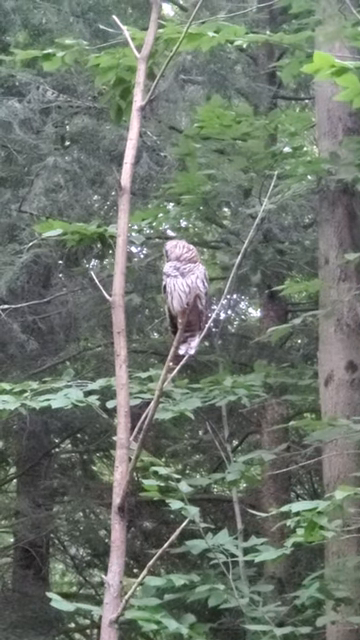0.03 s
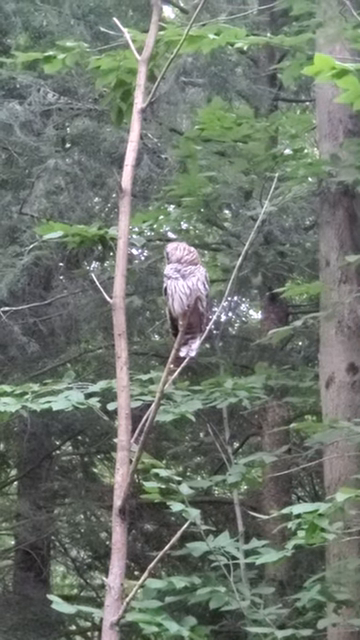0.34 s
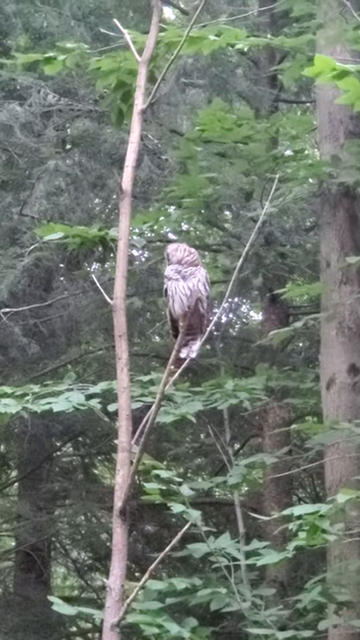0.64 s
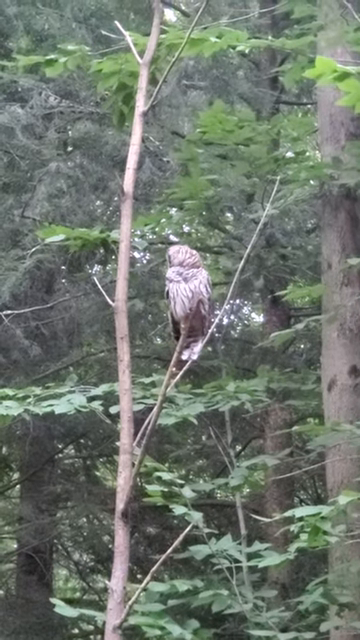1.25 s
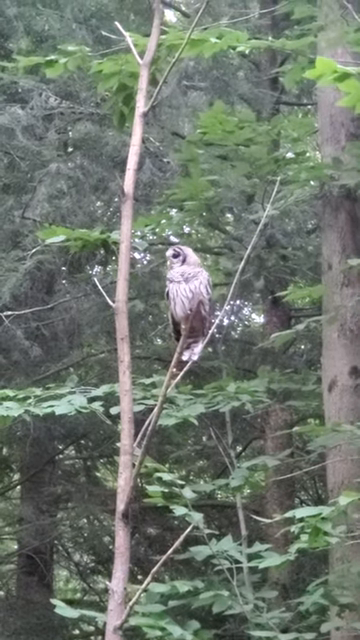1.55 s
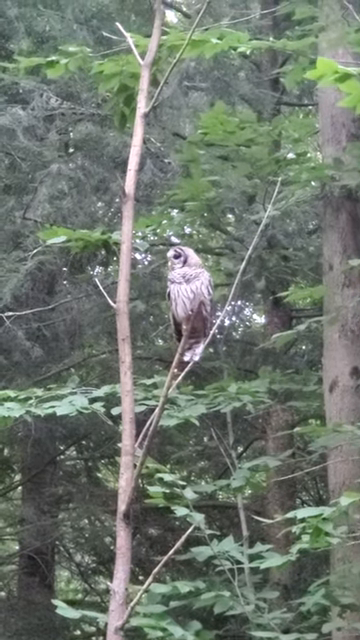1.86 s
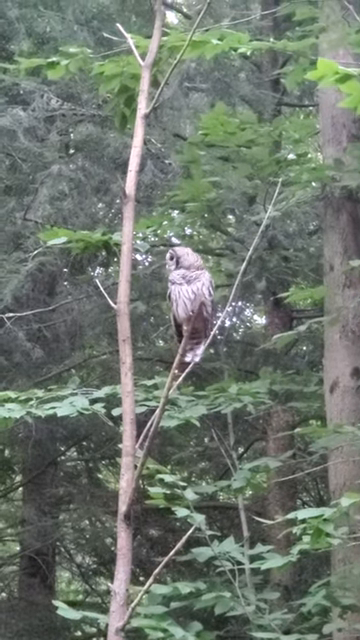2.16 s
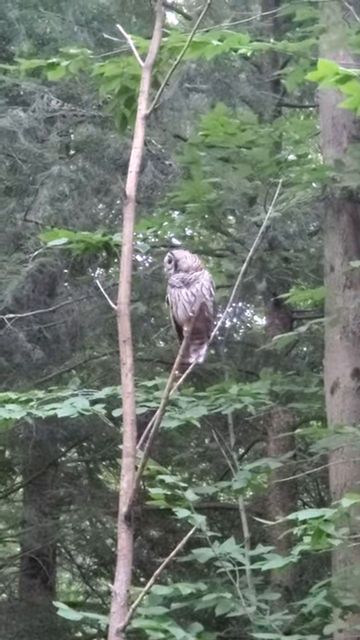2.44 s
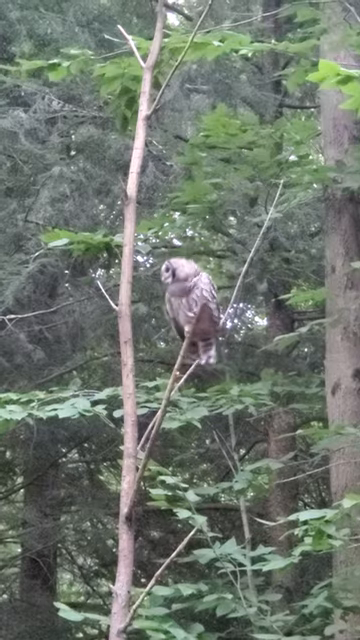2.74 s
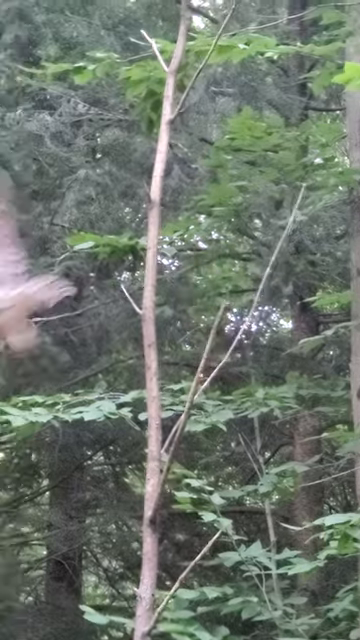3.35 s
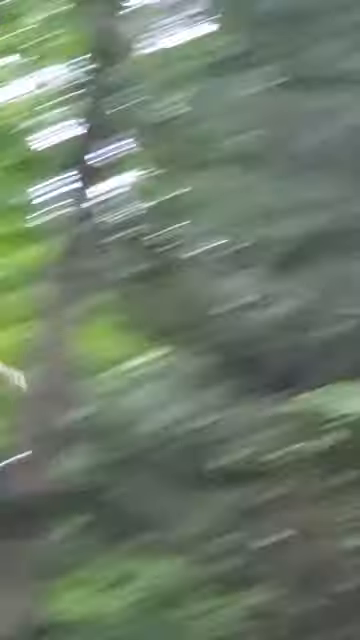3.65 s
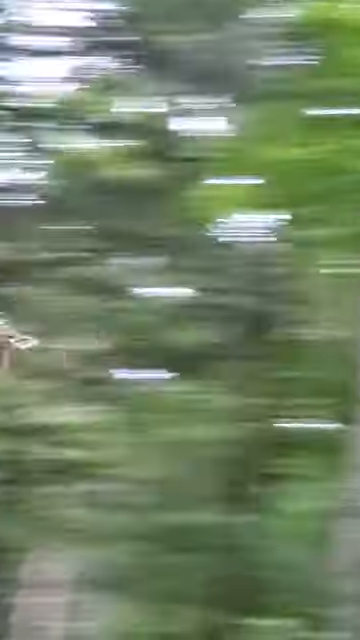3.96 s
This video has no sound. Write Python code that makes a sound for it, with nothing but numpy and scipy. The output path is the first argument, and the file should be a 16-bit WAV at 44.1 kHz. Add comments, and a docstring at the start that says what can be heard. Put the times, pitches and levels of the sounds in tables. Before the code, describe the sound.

An owl screeches once in a forest, over a steady low rumble, faint hiss and a throb like a distant idling engine. The harsh, raspy call starts at about 2.4 seconds with a wavering high whistle on top. It thins to a squeak near 3.2, swells twice more and ends in a yelp at 3.7, echoing briefly. A soft rustle rises from 3.4 seconds to the end.

```python
"""One long, harsh owl screech cuts through a forest: a rough voice near 1.1 kHz, a wavering whistle above it
and a rasp of turbulent breath, both pulsed by the voice. It thins to a squeak midway, swells twice more
and ends in a yelp that the trees scatter. Underneath sit a low throb like a distant idling engine,
a rumble and a faint hiss. A brief high sizzle in the trees comes before the call,
and a soft broadband rustle swells at the end."""
import sys
import numpy as np
from scipy import signal
from scipy.fft import rfft, irfft
from scipy.io import wavfile

SR = 44100
rng = np.random.default_rng(int(sys.argv[2]) if len(sys.argv) > 2 else 0)


def put_to_file(sound):
    """Save the sound as 16-bit audio at rate SR, in the file named by the first command-line argument."""
    columns = np.atleast_2d(sound).T  # one column per channel
    safe = np.clip(columns, -1, 1)
    whole_steps = np.round(safe * 32767)
    wavfile.write(sys.argv[1], SR, whole_steps.astype(np.int16))


N = 176400
TIME, FREQS = np.arange(N) / SR, np.arange(N // 2 + 1) * SR / N

# The owl's voice. Its layers' levels come before their trims; jitter and shimmer scale with roughness.
# time_s, pitch_hz, level_db, roughness, overtone_boost_db
VOICE_CURVE = [(2.39, 1250, -77, 0.87, 8), (2.414, 1224, -66, 0.93, -4), (2.422, 1115, -54, 0.19, -5),
               (2.5, 1115, -59, 0.42, 1), (2.58, 1115, -58.5, 0.56, -1), (2.615, 1155, -58, 0.38, -3),
               (2.85, 1120, -58.5, 0.35, -6), (3.01, 1095, -60, 0.47, -8), (3.045, 1090, -75, 0.9, 9),
               (3.085, 1100, -56.5, 0.53, -6), (3.12, 1105, -60.5, 0.45, 0.5), (3.17, 1090, -80, 0.71, 10),
               (3.3, 1080, -90, 0.55, 5), (3.326, 1095, -51, 0, -5), (3.36, 1117, -52, 0.22, -6),
               (3.41, 1100, -54, 0.1, -15), (3.455, 1070, -70.5, 0.53, 12), (3.53, 1100, -94, 0.96, 0),
               (3.595, 1190, -62.5, 0.37, -1), (3.635, 1220, -66, 0.5, 7), (3.646, 1177, -50, .3, -4.5),
               (3.662, 1060, -55.5, 0.28, 10.5), (3.675, 1050, -80, 0.3, 4)]
# The voice's timbre: harmonic_number, level_db
VOICE_HARMONICS = [(1, 0), (2, -3.5), (3, -23.5), (4, -14.5), (5, -3.5), (6, -16), (7, -17.5), (8, -18.5)]
VOICE_JITTER, VOICE_SHIMMER, JITTER_HZ = .055, .8, 250
# The high whistle: time_s, pitch_hz, level_db, roughness
WHISTLE_CURVE = [(2.381, 6710, -71, 0.2), (2.388, 6830, -62, 0.3), (2.416, 6340, -55.5, 0.23),
                 (2.426, 6700, -64, 0.65), (2.44, 6596, -57, 0.34), (2.475, 6710, -55.5, 0.66),
                 (2.505, 6244, -62, 1.1), (2.55, 6450, -55, 1.02), (2.595, 6595, -64, 0.77),
                 (2.635, 6640, -54.5, 0.26), (2.68, 6730, -60, 0.22), (2.8, 6720, -61, 0.3),
                 (2.96, 6650, -76, 0.7), (3.02, 7190, -72, 0.1), (3.08, 7030, -66, 0.25),
                 (3.122, 6950, -65, 0.21), (3.148, 6430, -59, 0.2), (3.168, 6320, -60, 0.06),
                 (3.188, 5766, -57, 0.24), (3.21, 5740, -71, 0.16), (3.228, 5800, -53.5, 0.2),
                 (3.245, 5540, -66, 0.34), (3.295, 5640, -97, 0.33), (3.303, 6450, -59, .2),
                 (3.318, 7100, -82, 0.7), (3.39, 7050, -72, 0.88), (3.44, 6870, -55, 0.24),
                 (3.478, 6680, -56, .35), (3.487, 7440, -65, 0.27), (3.502, 6660, -58, 0.2),
                 (3.517, 6090, -58, 0.23), (3.538, 6400, -96, 0.04), (3.546, 6770, -57, 0),
                 (3.563, 6900, -58, .1), (3.578, 6470, -64, 0.3), (3.596, 6960, -50, 0.28),
                 (3.62, 7180, -51, 0.2), (3.636, 7070, -48.5, 0.18), (3.648, 6404, -53, 0.9),
                 (3.66, 6600, -46, 0.6), (3.666, 6140, -90, .9)]
WHISTLE_JITTER, WHISTLE_SHIMMER, WHISTLE_FLUTTER_HZ = .034, .77, 384
WHISTLE_BEAT, WHISTLE_FRINGE, FRINGE_WIDTH_HZ = .18, .5, 610
# The squeak where the voice gives way: time_s, pitch_hz, level_db
SQUEAK_CURVE = [(3.18, 4295, -77), (3.195, 4293, -60.5), (3.255, 4320, -58), (3.276, 3970, -77),
                (3.293, 4250, -60), (3.32, 4310, -87), (3.5, 3960, -90), (3.518, 3952, -61),
                (3.54, 4240, -66), (3.56, 3980, -75)]
SQUEAK_JITTER, SQUEAK_OCTAVE_DB = .004, -20
# Faders for the rasp's three bands: time_s, low_db, middle_db, treble_db
RASP_FADERS = [(2.385, -88, -88, -73), (2.41, -82, -75, -64), (2.43, -74, -63, -63),
               (2.47, -73, -57.5, -70), (2.7, -67, -56, -68.5), (2.97, -64.5, -57.5, -70),
               (3.051, -63, -58, -80), (3.09, -64, -58, -68), (3.16, -61.5, -60, -89),
               (3.21, -74, -72, -88), (3.28, -80, -93, -93), (3.305, -75, -52.5, -85),
               (3.33, -61.5, -60, -64), (3.4, -60.5, -55, -62), (3.46, -62.5, -60, -68),
               (3.52, -67, -69, -93), (3.57, -62, -60, -79), (3.61, -59.5, -61, -62),
               (3.64, -56.5, -61, -68), (3.658, -52, -60, -62), (3.677, -77, -56, -66)]
# Throat and beak resonances in each band: frequency_hz, density_db
RASP_LOW_COLOUR = [(1000, -5), (1800, -29), (2050, -2), (2330, 3), (2850, -2), (3350, -0.5), (3900, -10.5),
                   (4500, -15), (6000, -34)]
RASP_MIDDLE_COLOUR = [(3000, -30), (3950, -12), (4300, 1), (4600, 4), (5000, -5), (5550, -1), (6100, -1),
                      (6700, 3), (7300, -5), (8000, -20), (12000, -45)]
RASP_TREBLE_COLOUR = [(6000, -52), (7000, -24), (7700, 10.5), (8300, 5), (8950, 5), (9500, -4), (10300, -9),
                      (13000, -20), (16000, -44)]
RASP_PULSING, RASP_FLUTTER_DB, RASP_FLUTTER_HZ = .5, 1, 70
VOICE_TRIM_DB, SQUEAK_TRIM_DB, RASP_TRIM_DB = -1.2, -1, -2
NEAR_TONE_SEND_DB, NEAR_RASP_SEND_DB, FOREST_SEND_DB = -12, -2, -6.5

# The engine's idle: time_s, speed_hz
ENGINE_IDLE = [(0, 17.54), (.9, 17.53), (1.35, 17.6), (2.1, 17.65), (2.6, 17.62), (4, 17.61)]
# The throb's timbre: harmonic_number, level_db
ENGINE_HARMONICS = [(1, -9), (2, 1.5), (3, -8.5), (4, 3), (5, -5.5), (6, 0.5), (7, -27), (8, -4), (9, -17),
                    (10, -15), (11, -44.5), (12, -13), (13, -11), (14, -34), (15, -9), (16, -16.5),
                    (17, -10.5), (18, -31), (19, -23)]
ENGINE_TRIM_DB, ENGINE_SHIMMER, ENGINE_SMEAR_HZ, FIRST_FIRING_S = -51, .15, 185, .0305
# Faders for the soft rustle that swells at the end and the sizzle in the trees: time_s, level_db
RUSTLE_FADER = [(3.0, -100), (3.4, -68.5), (3.85, -67.5), (3.95, -67), (4.0, -61)]
SIZZLE_FADER = [(.7, -100), (1.15, -87), (1.7, -89), (2.0, -100)]
# Colours of the background noises: frequency_hz, density_db
RUSTLE_SPECTRUM = [(500, -4), (1300, 4), (2000, -3), (3500, 0), (4700, -7), (5800, -2), (8000, -14),
                   (12500, -10), (15000, -21)]
SIZZLE_SPECTRUM = [(4800, -52), (5450, 3), (5750, -4), (6000, 6), (6600, -60)]
RUMBLE_SPECTRUM = [(20, -35), (35, -14.5), (60, 0), (90, 3.5), (130, -5), (190, -11.5), (270, -5.5),
                   (380, -16), (520, -19), (660, -16), (850, -25.5), (1200, -30.5), (1600, -41),
                   (3000, -69.5)]
HISS_SPECTRUM = [(1000, 1), (2000, 5), (3200, 3.5), (3950, 3.5), (4400, -4.5), (5200, -4), (5700, -0.5),
                 (6300, -7), (8000, -6), (11200, -7.5), (11900, 1.5), (12950, 1.5), (13250, -13.5),
                 (16000, -6.5)]
# How alike the two sides of those noises are: frequency_hz, correlation (clipped to 0-0.995 in use)
STEREO_LIKENESS = [(60, 0.81), (130, 0.95), (290, 0.86), (640, 0.42), (1410, -0.78), (3100, -3.5),
                   (6820, 0.01), (15000, 0.11)]
# Stereo placement of the owl and the background: frequency_hz, left_minus_right_db
OWL_BALANCE = [(950, 1), (1250, 16.5), (1500, 7), (2250, -11), (3200, 0.5), (4400, 8), (5600, -4),
               (6600, 14.5), (7300, -12), (8050, 39), (8700, 0), (11000, 20)]
BACKGROUND_BALANCE = [(60, 1.6), (300, 0.7), (700, 1.5), (1300, -4.5), (2000, -3), (3800, 4.5),
                      (5700, -1.5), (7500, 10.5), (10000, 3.5), (12400, 11.5), (15000, -4)]


def owl_voice():
    """A harmonic tone roughened by jitter and shimmer; gives the sound and its running phase."""
    hz, db, rough, boost_db = in_time(VOICE_CURVE)
    cycle = phase_of(hz * (1 + VOICE_JITTER * rough * drift(JITTER_HZ)))
    voice = 0
    for k, harmonic_db in VOICE_HARMONICS:
        gain = from_db(harmonic_db + boost_db * (k > 1))
        partial = np.sin(k * cycle + rng.uniform(0, 2 * np.pi))
        voice += gain * partial * shimmer(VOICE_SHIMMER * rough, JITTER_HZ)
    return np.sqrt(2) * from_db(db + VOICE_TRIM_DB) * gate(VOICE_CURVE) * voice, cycle


def owl_whistle(voice_cycle):
    """A second, high oscillator, by turns pure and ragged, beating with the voice inside a noisy fringe."""
    hz, db, rough = in_time(WHISTLE_CURVE)
    phase = phase_of(hz * (1 + WHISTLE_JITTER * rough * drift(WHISTLE_FLUTTER_HZ)))
    tone = np.sin(phase) * shimmer(WHISTLE_SHIMMER * rough, WHISTLE_FLUTTER_HZ)
    beat = 1 + WHISTLE_BEAT * np.sin(voice_cycle)
    fringe = WHISTLE_FRINGE * drift(FRINGE_WIDTH_HZ) * np.cos(phase)
    return np.sqrt(2) * from_db(db) * gate(WHISTLE_CURVE) * (tone * beat + fringe)


def owl_squeak():
    """A thin, nearly pure tone with a faint octave on top."""
    hz, db = in_time(SQUEAK_CURVE)
    phase = phase_of(hz * (1 + SQUEAK_JITTER * drift(JITTER_HZ)))
    tone = np.sin(phase) + from_db(SQUEAK_OCTAVE_DB) * np.sin(2 * phase)
    return np.sqrt(2) * from_db(db + SQUEAK_TRIM_DB) * gate(SQUEAK_CURVE) * tone


def owl_rasp(voice_cycle):
    """Turbulence in the throat, released in puffs by each cycle of the voice."""
    puffs = 1 + RASP_PULSING * np.sin(voice_cycle)
    flutter = from_db(RASP_FLUTTER_DB * drift(RASP_FLUTTER_HZ))
    breath = puffs * flutter * rng.standard_normal(N)
    colours = RASP_LOW_COLOUR, RASP_MIDDLE_COLOUR, RASP_TREBLE_COLOUR
    bands = [from_db(db) * coloured(breath, colour) for db, colour in zip(in_time(RASP_FADERS), colours)]
    return from_db(RASP_TRIM_DB) * gate(RASP_FADERS) * sum(bands)


def tree_reverb(x, t60_s):
    """Dense, dying reflections from trunks and leaves, different on each side."""
    echoes = rng.standard_normal((2, SR)) * from_db(-60 * TIME[:SR] / t60_s)
    echoes /= np.sqrt(np.sum(echoes ** 2, axis=1, keepdims=True))
    return signal.fftconvolve(x[None], echoes, axes=1)[:, :N]


def engine_throb():
    """Strong and weak firings in turn; low harmonics stay in step, higher ones arrive smeared."""
    speed_hz, = in_time(ENGINE_IDLE)
    cycle = phase_of(speed_hz) - 2 * np.pi * speed_hz[0] * FIRST_FIRING_S
    throb = 0
    for k, db in ENGINE_HARMONICS:
        smear = rng.standard_normal() * (k * speed_hz[0] / ENGINE_SMEAR_HZ) ** 2
        throb += from_db(db) * shimmer(ENGINE_SHIMMER, rate_hz=4.4) * np.sin(k * cycle + smear)
    return np.sqrt(2) * from_db(ENGINE_TRIM_DB) * throb


def noise_bed(spectrum, level_db):
    """Stereo noise, narrow in the bass and wide in the treble, at a fixed or moving level."""
    alike = np.clip(per_hz(STEREO_LIKENESS), 0, .995)
    mid = rfft(coloured(rng.standard_normal(N), spectrum)) * np.sqrt((1 + alike) / 2)
    side = rfft(coloured(rng.standard_normal(N), spectrum)) * np.sqrt((1 - alike) / 2)
    return from_db(level_db) * irfft(np.array([mid + side, mid - side]), N)


def from_db(db):
    """Decibels to gain."""
    return 10 ** (np.asarray(db) / 20)


def rms_one(x):
    """Scale to rms 1."""
    return x / np.sqrt(np.mean(x ** 2) + 1e-20)


def in_time(curve):
    """A curve's columns at every sample."""
    time_s, *columns = np.transpose(curve)
    return [np.interp(TIME, time_s, column) for column in columns]


def gate(curve):
    """1 while a curve lasts, else 0."""
    return (TIME > curve[0][0]) & (TIME < curve[-1][0])


def per_hz(points):
    """A table at every frequency, joined on a log axis."""
    hz, value = np.transpose(points)
    return np.interp(np.log(FREQS + 1e-9), np.log(hz), value)


def coloured(x, spectrum):
    """Equalise with a colour, then scale to rms 1."""
    return rms_one(irfft(rfft(x) * from_db(per_hz(spectrum)), N))


def drift(rate_hz):
    """Random wander up to about the given rate, rms 1."""
    return rms_one(irfft(rfft(rng.standard_normal(N)) / (1 + (FREQS / rate_hz) ** 2), N))


def shimmer(depth, rate_hz):
    """A flickering gain with mean power 1."""
    return (1 + depth * drift(rate_hz)) / np.sqrt(1 + depth ** 2)


def phase_of(hz):
    """Running phase of a pitch curve."""
    return 2 * np.pi * np.cumsum(hz) / SR


def panned(x, balance):
    """Lean each frequency left or right, keeping its power."""
    gains = from_db(per_hz(balance) / 2 * np.array([[1], [-1]]))
    return irfft(rfft(x) * gains / np.sqrt(np.mean(gains ** 2, axis=0)), N)


def scene():
    """The owl up front with a close and a longer reverb, over the throb and the noise beds."""
    voice, cycle = owl_voice()
    tones = voice + owl_whistle(cycle) + owl_squeak()
    rasp = owl_rasp(cycle)
    near_send = from_db(NEAR_TONE_SEND_DB) * tones + from_db(NEAR_RASP_SEND_DB) * rasp
    near = tree_reverb(near_send, t60_s=.06)
    forest = from_db(FOREST_SEND_DB) * tree_reverb(tones + rasp, t60_s=.48)
    screech = tones + rasp + near + forest
    rustle = noise_bed(RUSTLE_SPECTRUM, in_time(RUSTLE_FADER)[0])
    sizzle = noise_bed(SIZZLE_SPECTRUM, in_time(SIZZLE_FADER)[0])
    throb = engine_throb()
    rumble = noise_bed(RUMBLE_SPECTRUM, level_db=-46.5)
    hiss = noise_bed(HISS_SPECTRUM, level_db=-73)
    background = throb + rumble + hiss + rustle + sizzle
    return panned(screech, OWL_BALANCE) + panned(background, BACKGROUND_BALANCE)


def record(dry):
    """A steep high cut on the whole mix."""
    cutoff_hz = 15800
    return irfft(rfft(dry) / np.sqrt(1 + (FREQS / cutoff_hz) ** 200), N)


dry = scene()
out = record(dry)
put_to_file(out)
```